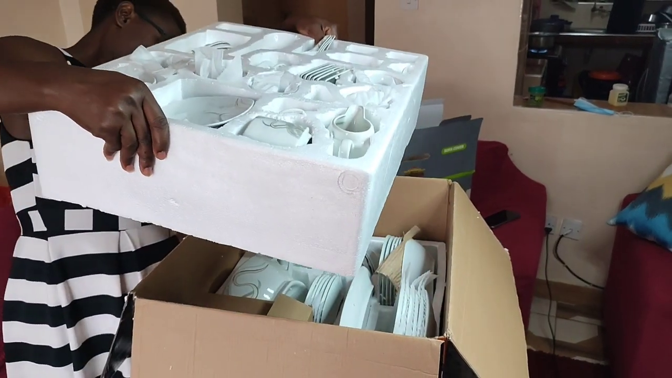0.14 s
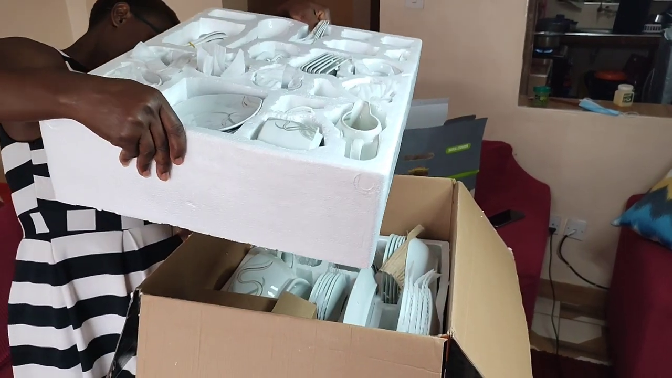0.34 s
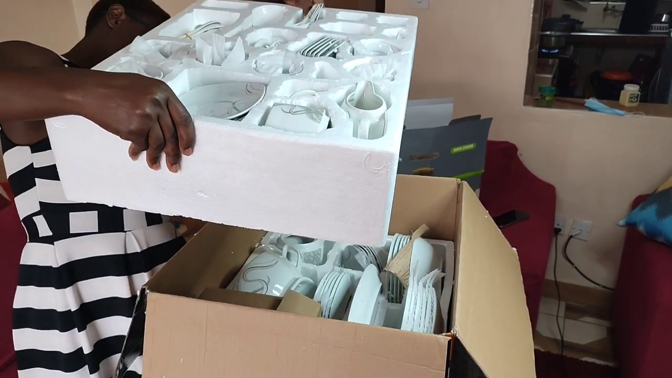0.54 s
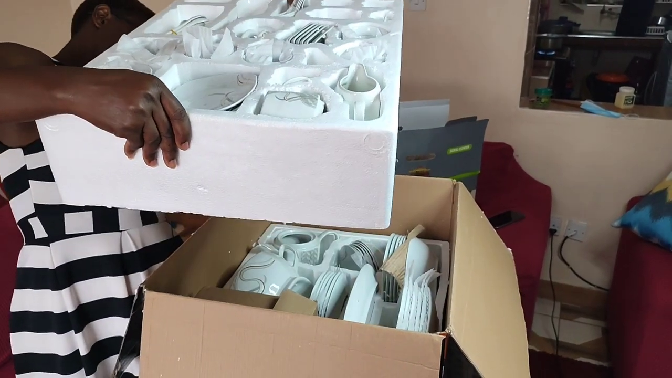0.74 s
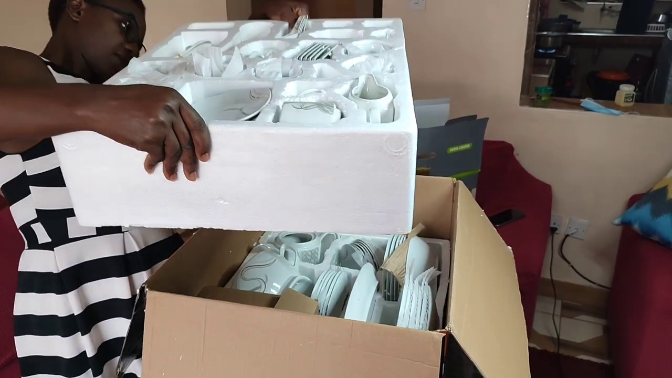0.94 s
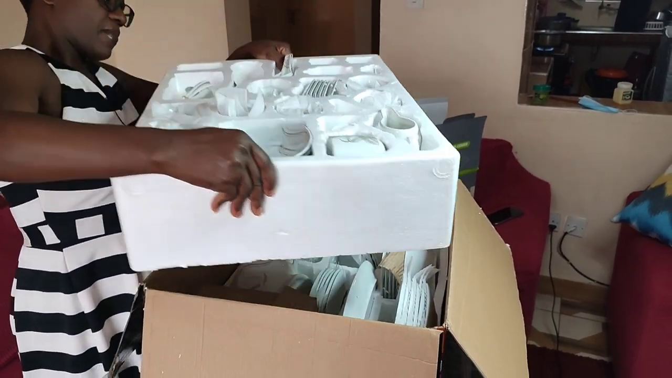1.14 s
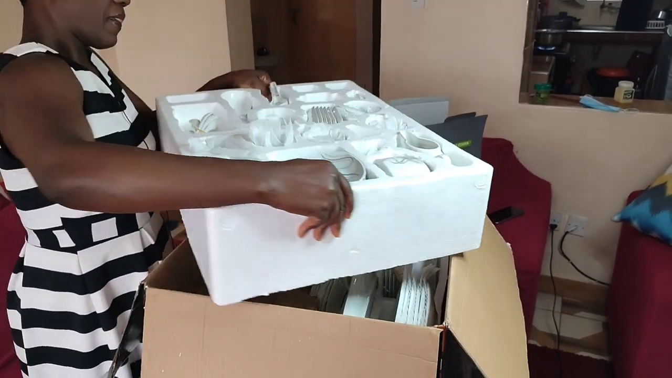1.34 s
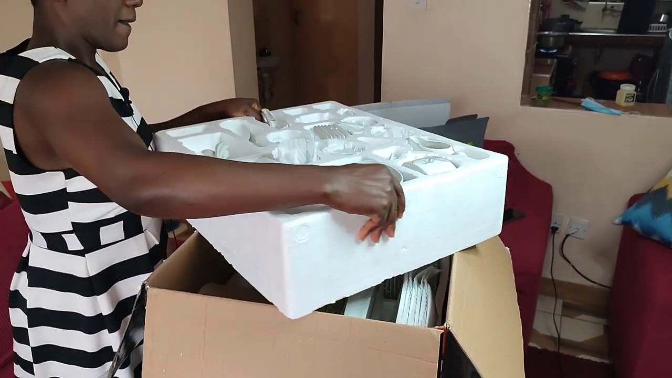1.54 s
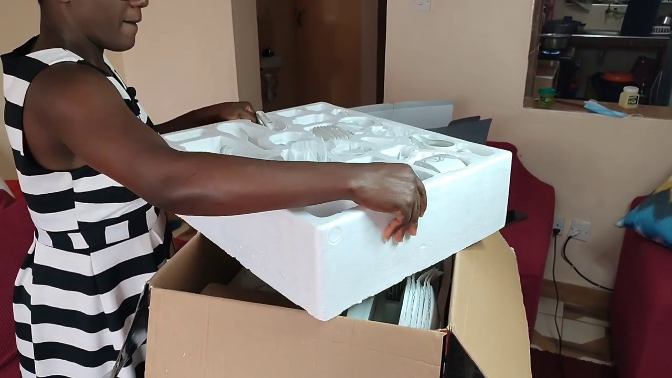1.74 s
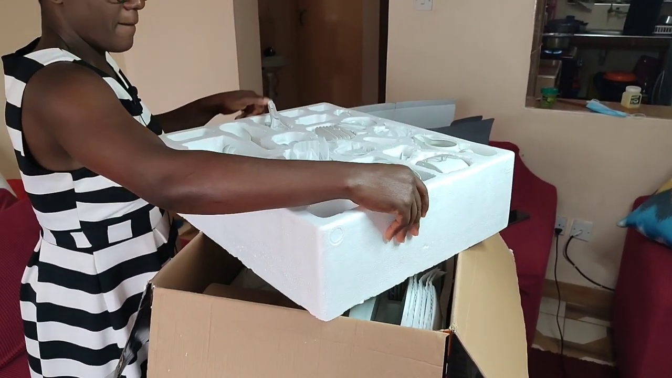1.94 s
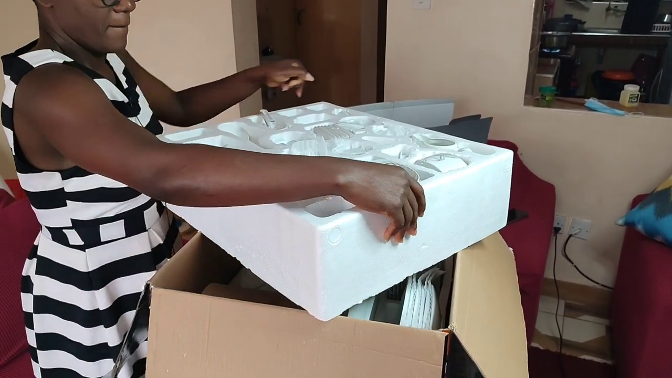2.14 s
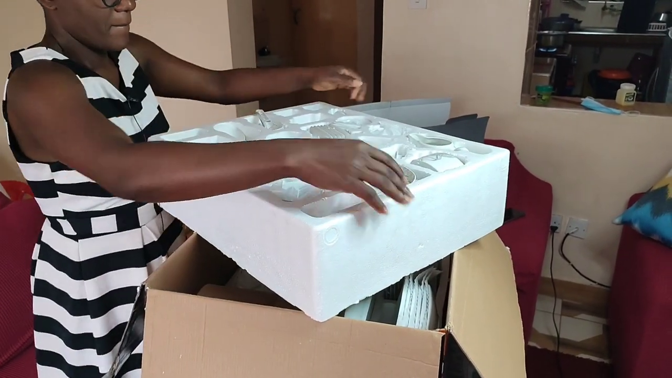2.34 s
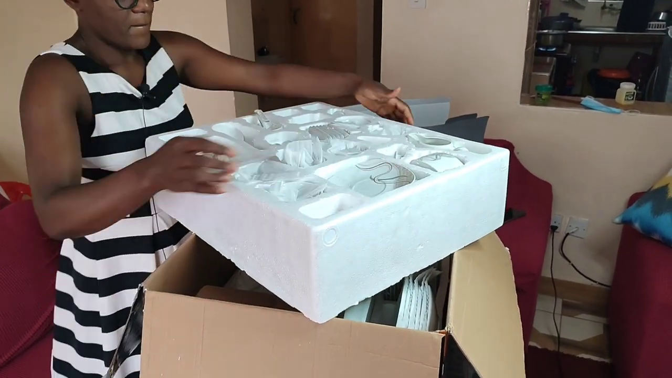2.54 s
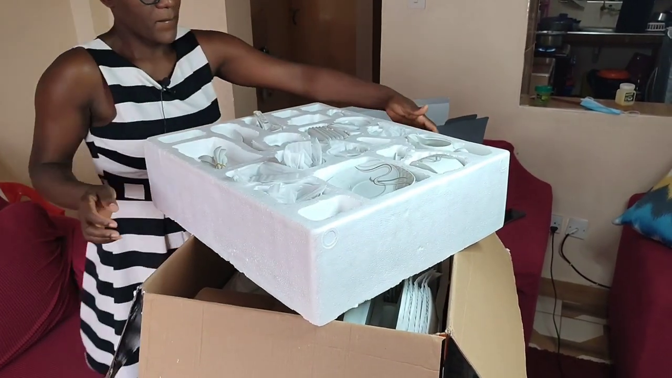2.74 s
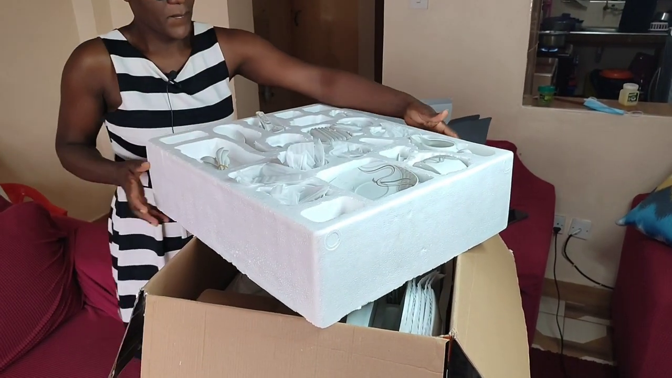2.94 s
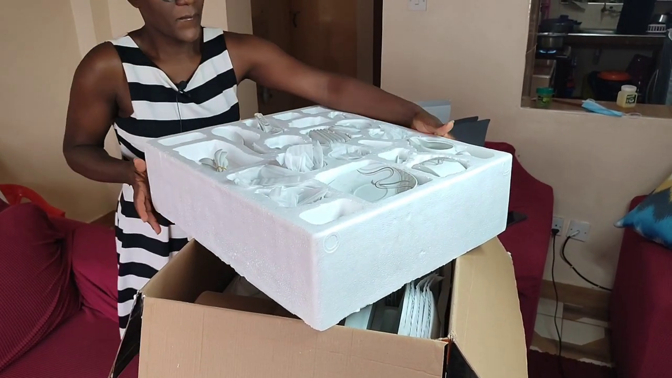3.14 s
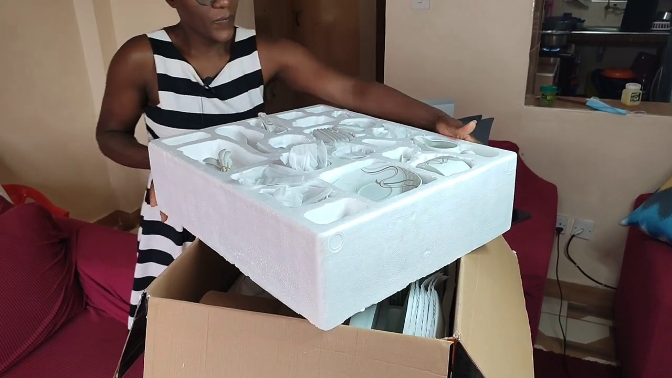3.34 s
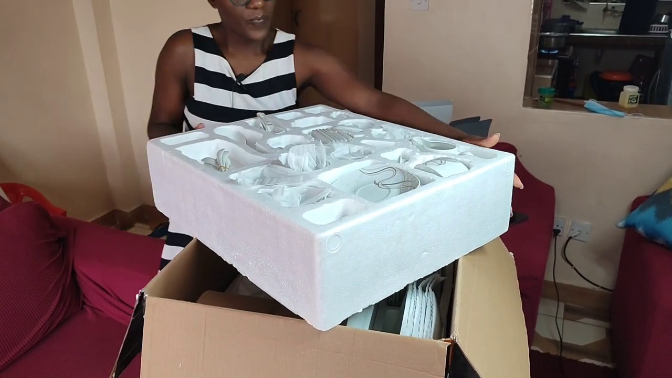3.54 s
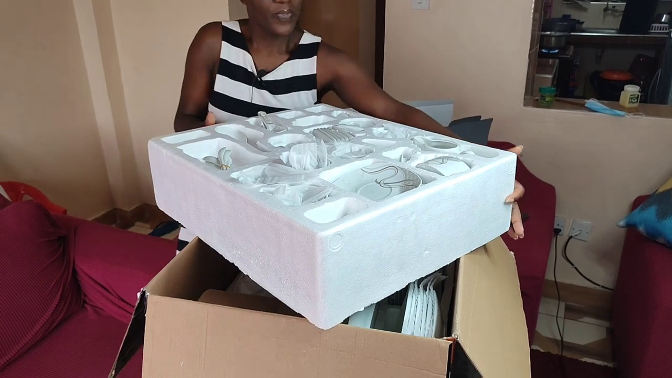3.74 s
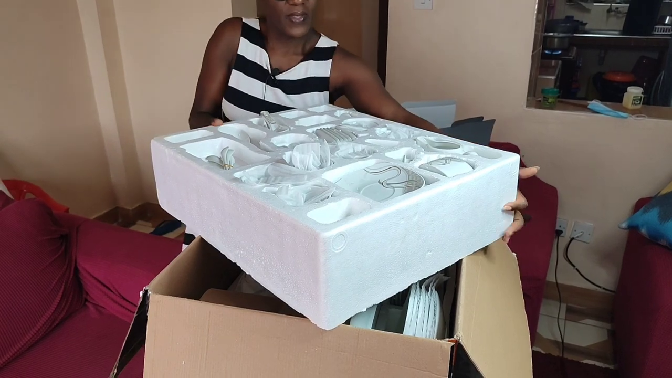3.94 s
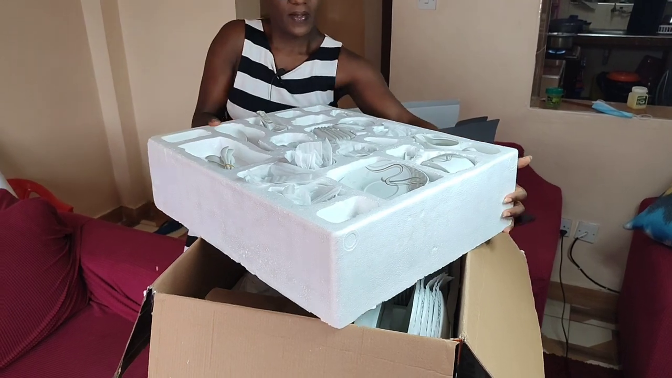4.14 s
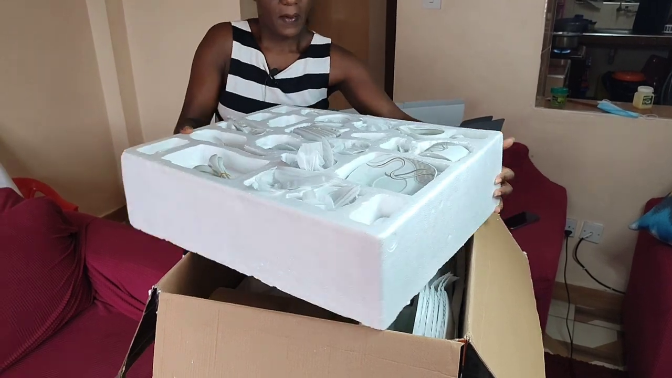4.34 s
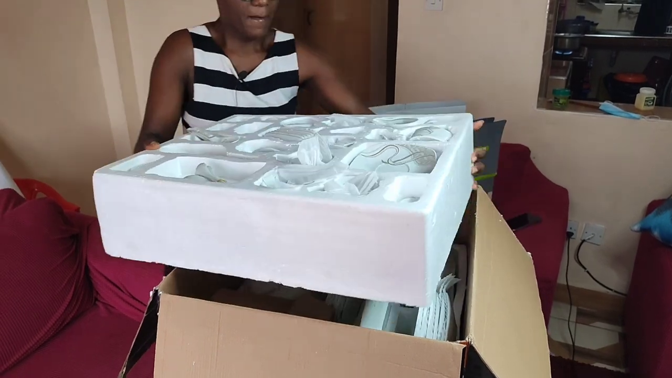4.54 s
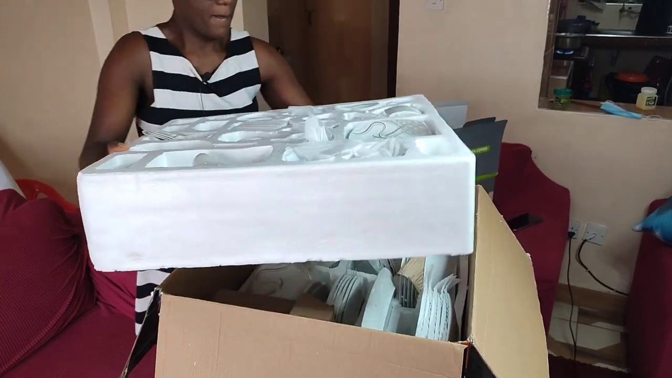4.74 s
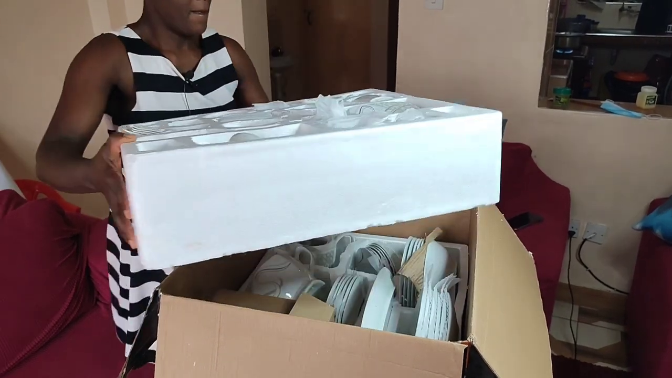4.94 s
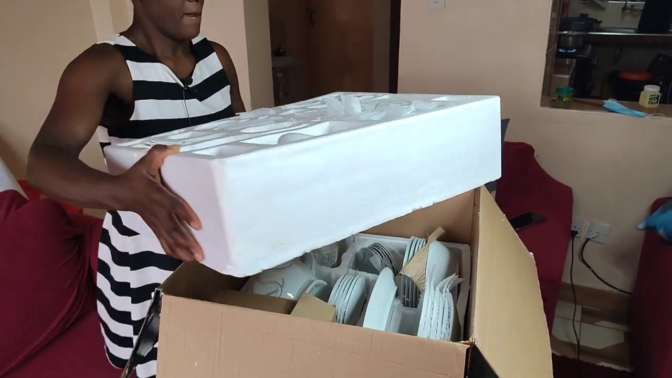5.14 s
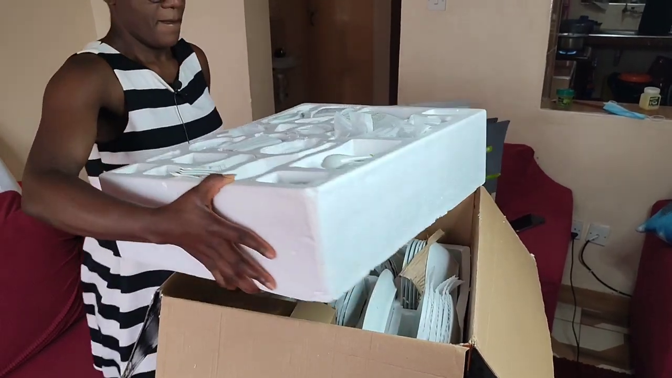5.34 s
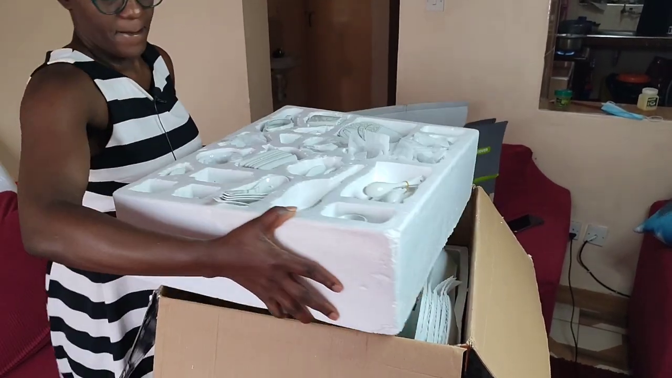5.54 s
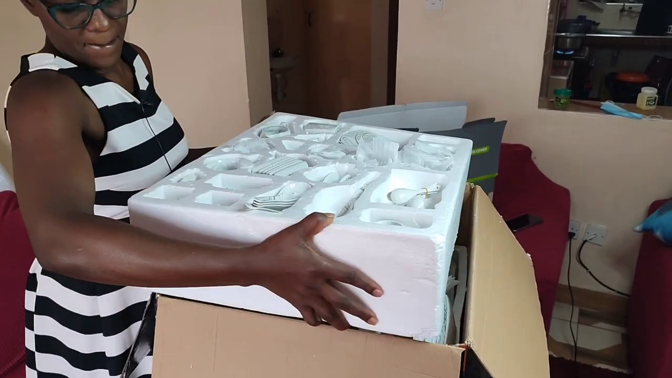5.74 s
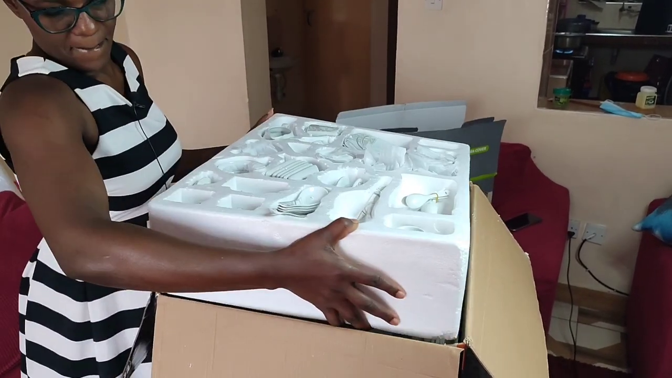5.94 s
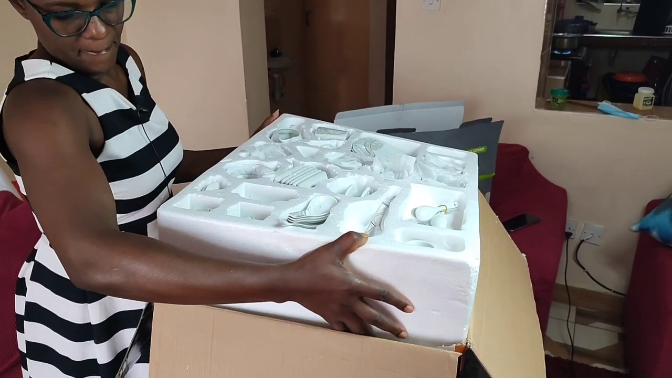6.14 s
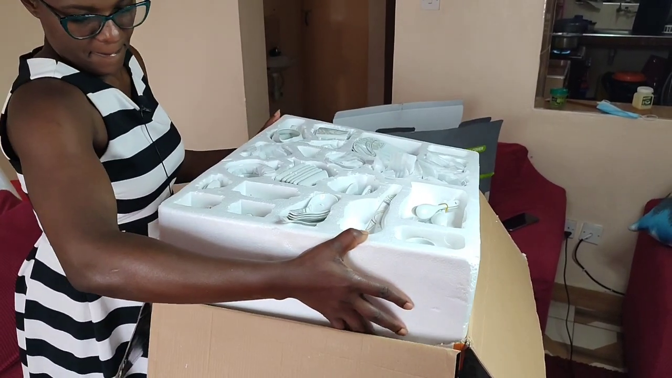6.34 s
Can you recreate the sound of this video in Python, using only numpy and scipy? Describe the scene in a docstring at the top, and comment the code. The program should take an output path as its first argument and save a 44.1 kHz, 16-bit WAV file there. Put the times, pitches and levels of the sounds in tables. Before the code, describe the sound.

Foam rubs on cardboard in short, grainy strokes, heard by a nearby hand-held microphone indoors. Soft ticks and brushing lead to a hollow thud with rough scraping, then tiny squeaks and light rubbing. Later the scrapes grow stronger, creaks cluster while the tray is turned, and it grinds down into the box with dull booms and a last sharp cluster of knocks.

```python
"""A loaded foam tray scrapes, catches and squeaks along the card edges of an open box as it is lowered in.
Scraping and squeaks are stick-slip friction; ticks and creaks are stress let go as dispersive bending waves.
Knocks are crushed foam with decaying tray modes, booms are gliding modes of the box, and its air hums along.
Fingers brush the tray over room tone and rumble, in a small room with a short diffuse tail."""
import sys
import numpy as np
from scipy import signal
from scipy.fft import rfft, irfft, next_fast_len
from scipy.io import wavfile
from scipy.ndimage import uniform_filter1d

SR = 44100
rng = np.random.default_rng(int(sys.argv[2]) if len(sys.argv) > 2 else 0)


def digitize_waveform(pressure):
    """Quantize a signal to 16-bit integers and store it at the path in sys.argv[1].

    Rows of a 2-D input are taken as channels; values are limited to [-1, 1].
    """
    field = np.atleast_2d(pressure).T
    bounded = np.clip(field, -1, 1)
    quanta = np.round(bounded * 32767).astype(np.int16)
    wavfile.write(sys.argv[1], SR, quanta)


N = 286209

# relative spectrum of foam rasping on card: frequency_hz, density_db
RASP_SPECTRUM = [(70, -42), (150, 0), (290, -2.5), (430, 4.5), (1000, 0), (2900, -1.5), (3800, -8),
                 (7900, -7.5), (11000, -20), (15000, -29)]
# resonance of the hollow box: frequency_hz, width_hz, level_db
BOX_MODES = [(416, 33, -1)]


def amp(db):
    """Level law: decibels to amplitude gain."""
    return 10 ** (np.asarray(db) / 20)


def unit(x):
    """Power normalisation: scale to rms 1."""
    return x / np.sqrt(np.mean(x ** 2) + 1e-20)


def along(points, hz):
    """Logarithmic interpolation: read (frequency, value) points on a log frequency axis."""
    point_hz, values = np.transpose(points)
    return np.interp(np.log(hz + 1), np.log(point_hz + 1), values)


def wobble(rate):
    """Slow random modulation: straight lines between normal knots, rate knots a second."""
    return np.interp(np.arange(N) * rate / SR, np.arange(N), rng.standard_normal(N))


def filtered(x, response):
    """Linear filtering: multiply the spectrum of x by a complex response of frequency."""
    n = x.shape[-1]
    padded = next_fast_len(n + SR // 4)
    hz = np.fft.rfftfreq(padded, 1 / SR)
    return irfft(rfft(x, padded) * response(hz), padded)[..., :n]


def coloured(x, spectrum):
    """Minimum-phase filtering: a folded cepstrum gives a causal pulse of unit energy."""
    size = 4096
    gain = amp(along(spectrum, np.fft.rfftfreq(size, 1 / SR)))
    cepstrum = irfft(np.log(gain + 1e-6))
    # fold negative times onto positive ones, so that the pulse is causal
    cepstrum[1:size // 2] *= 2
    cepstrum[size // 2 + 1:] = 0
    pulse = irfft(np.exp(rfft(cepstrum)))
    return signal.fftconvolve(x, pulse / np.linalg.norm(pulse))[:len(x)]


def above(x, edge, order=4):
    """Smooth threshold: 0 well below the edge, one half at it, 1 well above."""
    return 1 - 1 / (1 + (x / edge) ** order)


def resonance(hz, centre_hz, width_hz):
    """Damped oscillator: complex band-pass response with gain 1 at the centre."""
    damping = 1j * hz * width_hz
    return damping / (centre_hz ** 2 - hz ** 2 + damping)


def resonant(hz, modes):
    """Modal superposition: direct sound plus the (centre, width, level) resonances of a body."""
    return 1 + sum(amp(db) * resonance(hz, centre_hz, width_hz) for centre_hz, width_hz, db in modes)


def bending(hz, lag):
    """Bending-wave dispersion: treble travels faster than bass; lag is the delay in s at 1 kHz."""
    return np.exp(-4j * np.pi * lag * np.sqrt(1000 * hz))


def slips(n, rate, spread_db):
    """Stick-slip: impulses of uneven size and random sign at random moments, rms 1."""
    chance, size = rng.random(n), rng.standard_normal(n)
    released = chance < rate / SR
    strength = amp(spread_db * np.clip(size, -2, 2))
    return unit(released * strength * rng.choice([-1, 1], n))


def add(track, s, sound):
    """Superposition: mix a sound into the track at time s."""
    part = track[max(round(s * SR), 0):][:len(sound)]
    part += sound[:len(part)]


def stroke(start, length, first_db, last_db):
    """Envelope of one arm movement: takes hold, changes evenly in dB, then runs out."""
    attack_s, release_db_per_s = 0.032, 310
    t = np.arange(N) / SR - start
    db = first_db + (last_db - first_db) * np.clip(t / length, 0, 1)
    db = db - release_db_per_s * np.maximum(t - length, 0)
    return np.clip(t / attack_s, 0, 1) * amp(np.maximum(db, -150))


def background(tone_db=-53, rumble_db=-43.0):
    """Stationary noise: room tone and the slightly unsteady low rumble of a hand-held microphone."""
    # relative noise spectra: frequency_hz, density_db
    tone_spectrum = [(20, -18), (80, -4), (200, 1.5), (600, -10.5), (1700, -14), (3900, -26.5), (7700, -30),
                     (10000, -58), (15000, -62)]
    rumble_spectrum = [(15, 0.5), (36, -12), (50, 1), (62, -12.5), (120, -12), (250, -57)]

    def noise(spectrum):
        """Spectral shaping: white noise given a spectrum, rms 1."""
        return unit(filtered(rng.standard_normal(N), lambda hz: amp(along(spectrum, hz))))

    tone = amp(tone_db) * noise(tone_spectrum)
    rumble = amp(rumble_db + 0.53 * wobble(5)) * noise(rumble_spectrum)
    return tone + rumble


def ticking(lag=0.001752, t60=0.063, scatter_db=-25, echo=0.0052, echo_db=-4, echo_hz=2500, gain_db=11):
    """Dispersion and reflection: a snap crosses the panel treble first, then returns duller from the edge."""
    # sharp ticks of the stressed foam, levels before gain_db: start_s, level_db, treble_db
    ticks = [(0.065, -9.5, -2.5), (0.11, -12, -3), (0.454, -5, -10), (0.739, -10, -24), (1.116, -13, -7),
             (2.748, -38, 6.5), (2.953, -4, -23), (4.502, -13.5, 1), (4.623, -19, -3), (4.671, -17, -7.5),
             (5.202, -9.5, -15), (5.28, -6, -23), (5.95, 1.5, -15), (6.074, 1.5, -27.5), (6.139, -7.5, -16),
             (6.229, -6, -20), (6.452, -12.5, -5.5)]
    # relative spectrum of a snap: frequency_hz, density_db
    tick_spectrum = [(120, -11.5), (300, 3), (800, 11), (1400, 11), (1850, 8.5), (2400, 7.5), (3700, -3),
                     (7300, -10), (15000, -34)]
    out, t = np.zeros(N), np.arange(SR // 8) / SR

    def panel(hz):
        """Edge reflection: the dispersed wave and its delayed, low-passed return."""
        dulling = amp(echo_db) * (1 - above(hz, echo_hz))
        return bending(hz, lag) * (1 + dulling * np.exp(-2j * np.pi * hz * echo))

    for s, db, treble_db in ticks:
        scatter = amp(scatter_db - 60 * t / t60) * rng.standard_normal(len(t))
        snap = coloured((t == 0) + scatter, tick_spectrum)
        tick = filtered(snap, lambda hz: panel(hz) * amp(treble_db * above(hz, 790, order=2)))
        add(out, s, amp(db + gain_db) * tick)
    return out


def box_air(x, width_hz=16, gain_db=10):
    """Cavity resonance: the air in the box hums along with x at a drifting pitch and coupling."""
    # the air in the box, joined by straight lines: time_s, pitch_hz, coupling_db (before gain_db)
    air = [(0.75, 212, 2.5), (1.15, 160, -7), (3.9, 165, -15), (4.6, 176, -2.5), (5.9, 166, -1)]
    s, *columns = np.transpose(air)
    hz, coupling_db = (np.interp(np.arange(N) / SR, s, column) for column in columns)
    # shift the pitch to 0 Hz, smooth with one pole, and shift back
    turn = np.exp(2j * np.pi * np.cumsum(hz) / SR)
    pole = np.exp(-np.pi * width_hz / SR)
    envelope = signal.lfilter([1 - pole], [1, -pole], x / turn)
    return amp(gain_db + coupling_db) * 2 * np.real(turn * envelope)


def rustling(gain_db=7):
    """Friction noise: fingers and cloth brush the tray and sound the hollow box."""
    # brushing, levels before gain_db: start_s, length_s, first_db, last_db
    rustles = [(0.232, 0.06, -52, -50), (0.3, 0.34, -66.5, -57), (2.515, 0.3, -57, -60.5),
               (4.593, 1, -52.5, -68), (6.36, 0.15, -46, -43.5)]
    # relative spectrum of brushing: frequency_hz, density_db
    finger_spectrum = [(130, 1), (230, 17), (1200, 2), (3000, 0.5), (4500, -10), (7000, -6), (10000, -22),
                       (15000, -38)]
    brush = coloured(rng.standard_normal(N) * amp(wobble(23.23)), finger_spectrum)
    brush = unit(filtered(brush, lambda hz: resonant(hz, BOX_MODES)))
    return amp(gain_db) * brush * sum(stroke(*row) for row in rustles)


def knocking(ring_db=-9, gain_db=-1, choke_s=0.023, after_db=-18):
    """Impact: a blow crushes foam and rings the tray until the card chokes it; harder blows reach higher."""
    # blows of the tray on the box, levels before gain_db: start_s, level_db, crunch_db, hardness_db_per_octave
    knocks = [(0.247, -16, -2.5, -3.5), (1.115, -30, 1, -26), (1.451, -23.5, 9, -18.5),
              (1.463, -13, 4.5, -8), (2.574, -32, 13.5, -9.5), (5.799, -22, 3.5, -1.5),
              (6.329, -7.5, 1.5, -2.5), (6.34, -6, 0, -3.5), (6.352, -10, -5, -11)]
    # tray modes, levels before ring_db: frequency_hz, level_db, t60_s
    tray_modes = [(270, -18.5, 0.052), (377.4, -3.5, 0.16), (546.5, -2, 0.16), (663, 8.5, 0.059),
                  (760, 9, 0.059), (990, -3, 0.12)]
    # relative spectrum of crushed foam: frequency_hz, density_db
    crunch_spectrum = [(60, -9.5), (130, -5.5), (300, 0.5), (800, -2.5), (1500, -4), (2400, -12.5),
                       (3100, -8), (3800, -20), (7600, -22), (15000, -36)]
    out, t = np.zeros(N), np.arange(SR // 4) / SR
    attack = 1 - np.exp(-t / .001)
    crush = amp(-60 * t / .06)  # 60 dB decay in 0.06 s
    choke = amp(after_db * above(t, choke_s))
    ring = np.zeros(len(t))
    for k, (hz, level_db, t60) in enumerate(tray_modes):
        # neighbouring modes start in opposite phase
        ring += (-1) ** k * amp(level_db - 60 * t / t60) * np.sin(2 * np.pi * hz * t)
    for s, db, crunch_db, hardness in knocks:
        crunch = coloured(rng.standard_normal(len(t)) * crush, crunch_spectrum)
        blow = attack * choke * (amp(ring_db) * ring + amp(crunch_db) * crunch)
        # spectral slope from 300 to 4000 Hz, pivoting at 500 Hz
        blow = filtered(blow, lambda hz: amp(hardness * np.log2(np.clip(hz, 300, 4000) / 500)))
        add(out, s, amp(db + gain_db) * blow)
    return out


def booming(shudder_db=4.5):
    """Modal vibration: two box modes swell under load, shudder and glide as the gap under the tray settles."""
    # loadings of the box; the offset is a share of the pitch, the overtone is relative to the first mode:
    # start_s, level_db, pitch_hz, t60_s, starting_offset, settling_s, overtone_db
    booms = [(0.26, -18.5, 212, 0.16, 0.1, 0.0086, -16), (1.113, -17, 148.8, 0.17, 1.015, 0.0193, -9.5),
             (1.456, -5, 172.8, 0.23, -0.15, 0.026, -38), (5.797, -10.5, 167.6, 0.13, 0.27, 0.0065, -6),
             (5.845, -20, 164.6, 0.26, 0.17, 0.0096, -21), (6.33, -11.5, 155.4, 0.14, 0.31, 0.0096, -6)]
    rise_s, overtone_ratio = 0.0041, 2.07
    out, t = np.zeros(N), np.arange(SR // 2) / SR
    for s, db, hz, t60, offset, settle, overtone_db in booms:
        pitch_hz = hz * (1 + offset * np.exp(-t / settle))
        phase = 2 * np.pi * np.cumsum(pitch_hz) / SR
        modes = np.sin(phase) + amp(overtone_db) * np.sin(overtone_ratio * phase)
        swell = 1 - np.exp(-(t / rise_s) ** 2)
        add(out, s, amp(db) * swell * amp(-60 * t / t60) * modes)
    return out * amp(shudder_db * wobble(130))


def creaking(gain_db=-10.5, lag=0.001185, catch_db=23, ring_db=5, ring_width_hz=170):
    """Stick-slip: a catch and a run of slips ring the stressed wall and the hollow box; dull creaks start
    softly."""
    # tray shifting in the grip or on the card, levels before gain_db:
    # start_s, level_db, length_s, treble_db, wall_ring_hz
    creaks = [(0.335, -32, 0.06, -1, 440), (0.491, -34.5, 0.043, 0, 437), (0.581, -29.5, 0.051, -2, 480),
              (0.727, -28, 0.018, -3.5, 490), (2.584, -26.5, 0.015, -5, 780), (3.751, -25, 0.014, -19, 486),
              (3.85, -22, 0.038, -6, 540), (4.615, -19.5, 0.018, -5, 800), (4.667, -18.5, 0.019, -6, 770),
              (4.772, -24, 0.016, -1, 645), (4.792, -23.5, 0.023, 6.5, 1020), (4.84, -23, 0.025, -3.5, 710),
              (4.883, -26, 0.022, -1, 610), (4.927, -24.5, 0.029, -2, 620), (4.964, -29, 0.019, -2, 740),
              (4.98, -24.5, 0.02, 4, 950), (5.036, -26.5, 0.021, 2, 1060), (5.194, -23, 0.034, -2, 1120),
              (5.655, -21.5, 0.018, 0.5, 470), (5.75, -18.5, 0.026, -12, 760), (5.839, -17, 0.015, 0, 810),
              (5.889, -24, 0.015, 9, 900), (5.96, -24.5, 0.038, -7, 593), (6.379, -37, 0.027, 21, 1100),
              (6.467, -25, 0.0089, 2.5, 920)]
    # relative spectrum of a creak: frequency_hz, density_db
    creak_spectrum = [(110, -40.5), (185, 2), (280, -10.5), (410, 0.5), (800, -1.5), (1500, -8),
                      (3000, -17.5), (8000, -31.5), (15000, -49)]
    out, t = np.zeros(N), np.arange(SR // 5) / SR
    for s, db, length, treble_db, ring_hz in creaks:
        run = slips(len(t), rate=800, spread_db=2.5) * np.exp(-(t / length) ** 2)
        catch = amp(catch_db + 2 * min(treble_db, 0)) * (t == 0)
        creak = coloured(catch + run, creak_spectrum)
        wall_modes = [(ring_hz, ring_width_hz, ring_db)]
        creak = filtered(creak, lambda hz: resonant(hz, wall_modes) * amp(treble_db * above(hz, 920)))
        add(out, s, amp(db + gain_db) * creak)
    return filtered(out, lambda hz: bending(hz, lag) * resonant(hz, BOX_MODES))


def shifting(x, depth_db):
    """Moving contact: narrow resonances swell and fade as the contact point moves."""
    z = signal.stft(x, nperseg=1024)[2]
    field = uniform_filter1d(rng.standard_normal(z.shape), size=4, axis=0)  # smooth over frequency
    field = uniform_filter1d(field, size=8, axis=1)  # smooth over time
    return signal.istft(z * amp(depth_db * unit(field)), nperseg=1024)[1][:N]


def scraping(flex_hz=1000, hiss_hz=4000, judder_db=1.42, grit_db=-7.0, grit_hz=4500, lag=0.001293,
             unsteady_db=0.43):
    """Stick-slip friction: fine slips and coarser catches rasp on card, with wall flexing and bead hiss."""
    # pushes along the card, onto the rim, turning round, then down into the box; flexing and hiss re rasp:
    # start_s, length_s, first_db, last_db, flex_db, hiss_db
    pushes = [ (0.979, 0.14, -49.5, -44, 3.5, -10), (1.126, 0.065, -33, -36.5, -9, -17),
              (1.19, 0.18, -47, -40.5, -4, -13), (1.39, 0.19, -28.5, -32, 0, -9.5),
              (1.546, 0.12, -26, -30.5, -3.5, -11), (1.643, 0.048, -30, -26.5, 0, -7),
              (1.684, 0.015, -27, -22.5, -2, -20), (1.781, 0.18, -39.5, -40.5, 0, -8),
              (2.03, 0.28, -42, -39, -3.5, -8.5), (2.308, 0.21, -38.5, -41, -6.5, -4),
              (2.978, 0.076, -23.5, -40, -6, -6.5), (3.05, 0.18, -46.5, -39.5, -3, -3.5),
              (3.309, 0.11, -46.5, -41, -0.5, 1.5), (3.453, 0.18, -43.5, -41.5, 0, -5.5),
              (3.642, 0.29, -38, -42.5, -3, -5), (3.983, 0.075, -48, -27.5, 0.5, -15),
              (4.055, 0.13, -28.5, -24, -6, -8), (4.171, 0.094, -33, -25, -1, -5),
              (4.297, 0.073, -39, -38.5, -2, -4.5), (4.387, 0.067, -33, -34, 4, -7),
              (4.494, 0.037, -15.5, -28.5, 4, -5.5), (5.368, 0.076, -46.5, -33, 0.5, -10.5),
              (5.462, 0.062, -26, -24, -1.5, -13.5), (5.54, 0.02, -18, -24, 2, -5),
              (5.581, 0.24, -36, -32.5, -2, -10.5), (5.837, 0.25, -32.5, -34.5, 3, -14),
              (6.105, 0.2, -35, -55.5, 6, -13.5), (6.309, 0.068, -26.5, -44, 1, -6),
              (6.433, 0.04, -35, -40.5, 11, -8)]
    # card wall resonances: frequency_hz, width_hz, level_db
    card_modes = [(557, 380, -7), (1670, 800, -20)]
    beads = slips(N, rate=9000, spread_db=0.0) * amp(judder_db * wobble(260))
    catches = slips(N, rate=160, spread_db=4)
    grit = filtered(catches, lambda hz: bending(hz, lag) * (1 - above(hz, grit_hz)))
    rasp = coloured(beads + amp(grit_db) * grit, RASP_SPECTRUM)
    rasp = filtered(rasp, lambda hz: resonant(hz, card_modes))
    rasp = shifting(rasp, depth_db=2.8)
    flexing = unit(filtered(rasp, lambda hz: 1 - above(hz, flex_hz, order=8)))
    middle = unit(filtered(rasp, lambda hz: above(hz, flex_hz, order=8) - above(hz, hiss_hz, order=8)))
    hiss = unit(filtered(rasp, lambda hz: above(hz, hiss_hz, order=8)))
    # overlapping pushes add in power, separately in each band
    power = np.zeros((3, N))
    for s, length, first_db, last_db, flex_db, hiss_db in pushes:
        power += (amp([[flex_db], [0], [hiss_db]]) * stroke(s, length, first_db, last_db)) ** 2
    bands = np.sum(np.sqrt(power) * [flexing, middle, hiss], axis=0)
    return amp(unsteady_db * wobble(27)) * bands


def squeaking(length=0.011, rasp_hz=2800, rasp_width_hz=1100, shrill_width_hz=800, body_db=-5, gain_db=-8):
    """Fast stick-slip: a brief rasp band and a shrill band over broadband friction noise."""
    # foam squeaks on the rim, levels before gain_db: start_s, level_db, shrill_hz, shrill_db, rasp_db
    squeaks = [(1.8546, -13, 7200, -13, -12), (1.904, -17, 8000, -0.5, -5.5), (2.016, -13, 7060, -12, -5.5),
               (2.0358, -11, 9000, -15, -9)]
    out, t = np.zeros(N), np.arange(SR // 16) / SR

    def band(centre_hz, width_hz):
        """Resonant selection: noise through one resonance, rms 1."""
        return unit(filtered(rng.standard_normal(len(t)), lambda hz: resonance(hz, centre_hz, width_hz)))

    for s, db, shrill_hz, shrill_db, rasp_db in squeaks:
        rasp = amp(rasp_db) * band(rasp_hz, rasp_width_hz)
        shrill = amp(shrill_db) * band(shrill_hz, shrill_width_hz)
        body = amp(body_db) * coloured(rng.standard_normal(len(t)), RASP_SPECTRUM)
        add(out, s, amp(db + gain_db) * (rasp + shrill + body) / (1 + (t / length) ** 4))
    return out


def room(x):
    """Diffuse reverberation: a noise tail, 5 ms late, in which each frequency decays at its own rate."""
    # reverberation times: frequency_hz, t60_s
    decay_times = [(150, 0.57), (2000, 0.21), (15000, 0.21)]
    hz, t, z = signal.stft(rng.standard_normal(SR // 2), SR, nperseg=256)
    decay = amp(-60 * t / along(decay_times, hz)[:, None])
    tail = signal.istft(z * decay, SR, nperseg=256)[1]
    delayed = np.pad(x, (SR // 200, 0))
    return signal.fftconvolve(delayed, tail / np.linalg.norm(tail))[:N]


def scene(wet_db=-11, boom_wet_db=-22):
    """Superposition of all sources in the room, nearly mono; a random side signal is added above about 5 kHz."""
    # spectrum of the side signal: frequency_hz, side_db (re mid)
    side_spectrum = [(2800, -78), (4200, -72), (5300, -10), (12000, -9)]
    handling = ticking() + creaking() + rustling()
    foam = scraping() + squeaking() + knocking() + handling + box_air(handling)
    boom = booming()
    reverberation = room(amp(wet_db) * foam + amp(boom_wet_db) * boom)
    mid = foam + boom + reverberation + background()
    side = filtered(mid, lambda hz: amp(along(side_spectrum, hz))) * unit(wobble(400))
    return np.array([mid + side, mid - side])


def record(dry):
    """Saturation and band limiting: the recorder rounds off the loudest peaks and cuts the top treble."""
    top_hz = 14550
    rounded = dry / (1 + np.abs(dry / .95) ** 6) ** (1 / 6)
    return filtered(rounded, lambda hz: 1 - above(hz, top_hz, order=120))


dry = scene()
out = record(dry)
digitize_waveform(out)
```